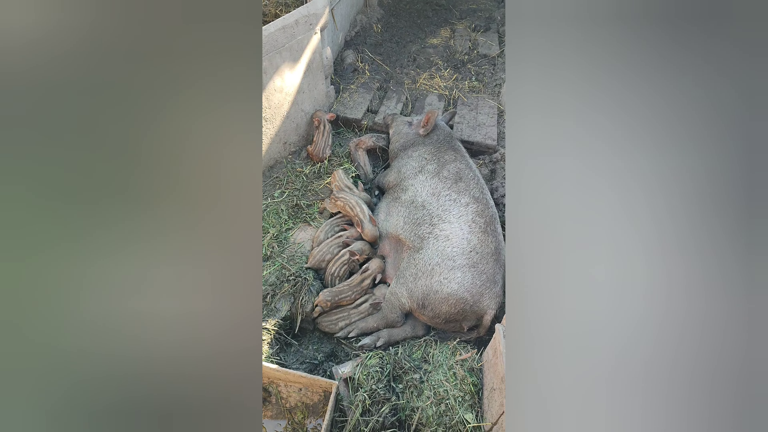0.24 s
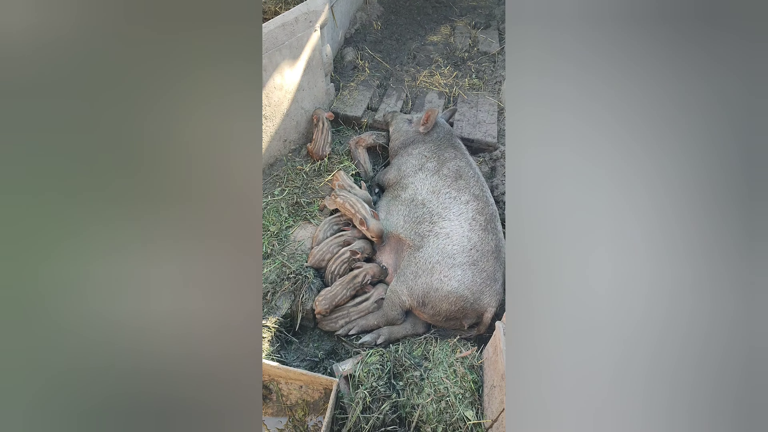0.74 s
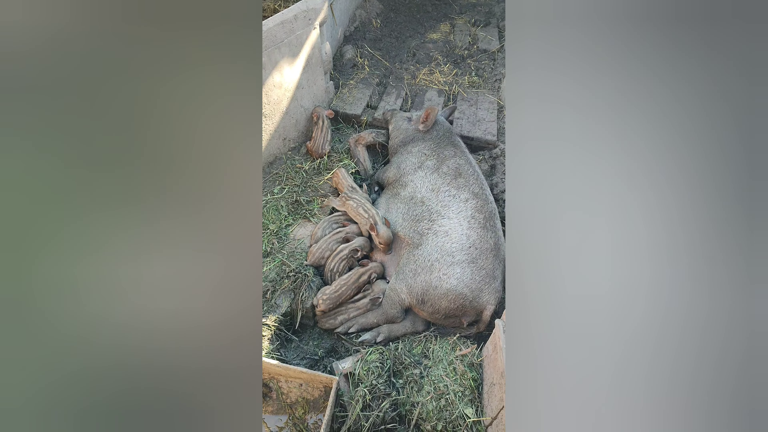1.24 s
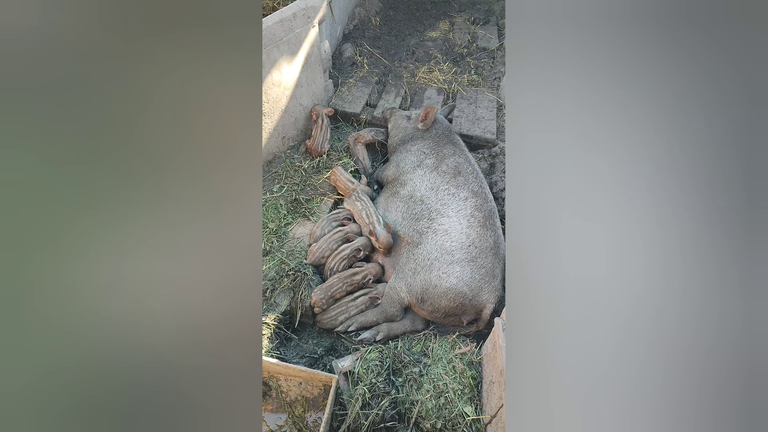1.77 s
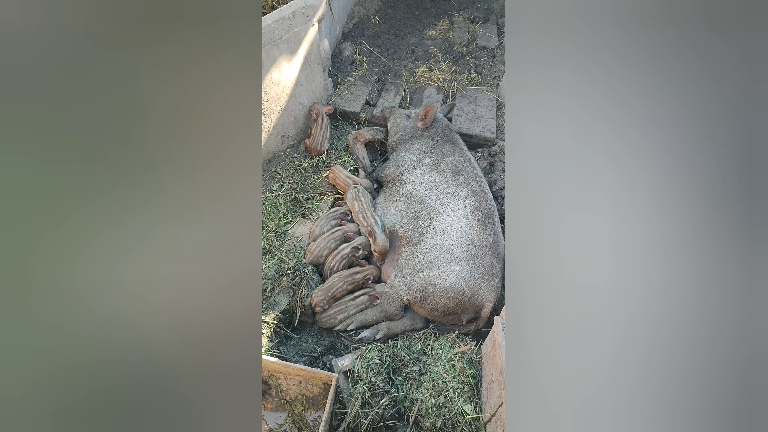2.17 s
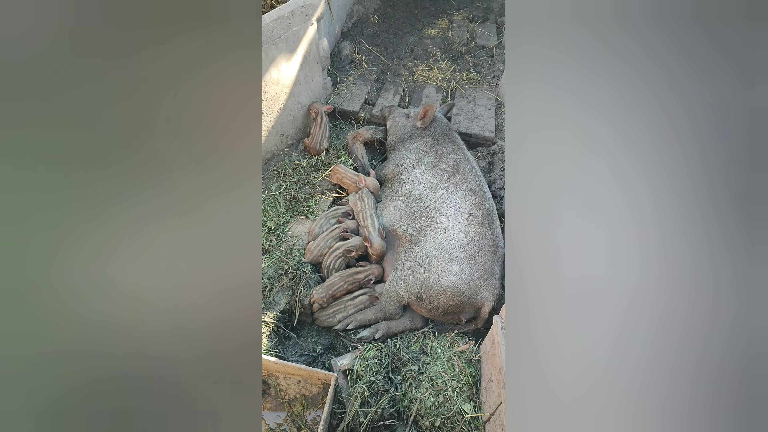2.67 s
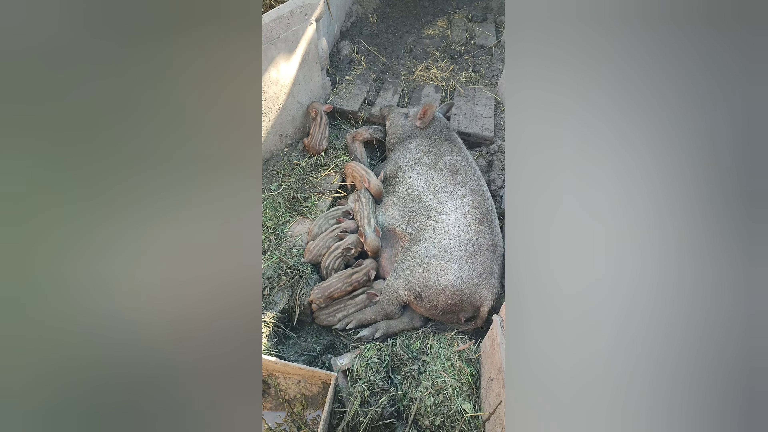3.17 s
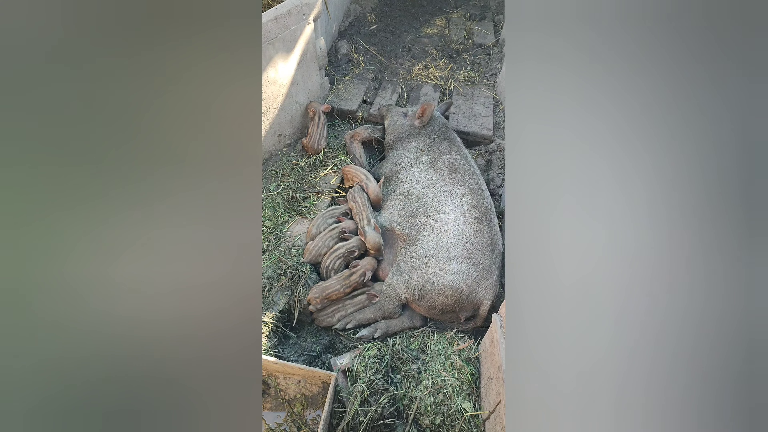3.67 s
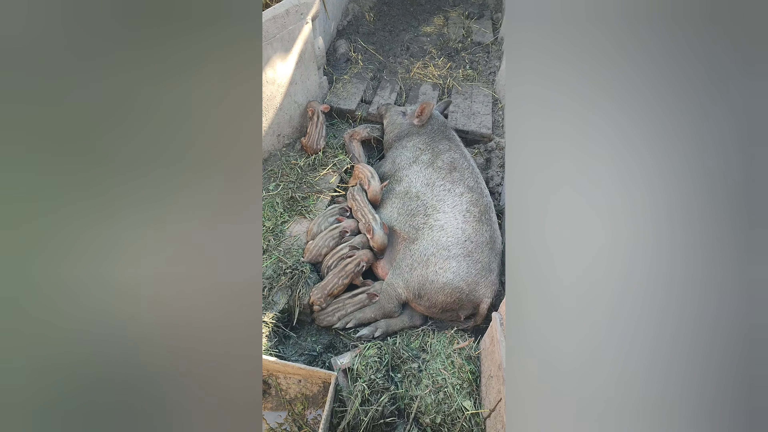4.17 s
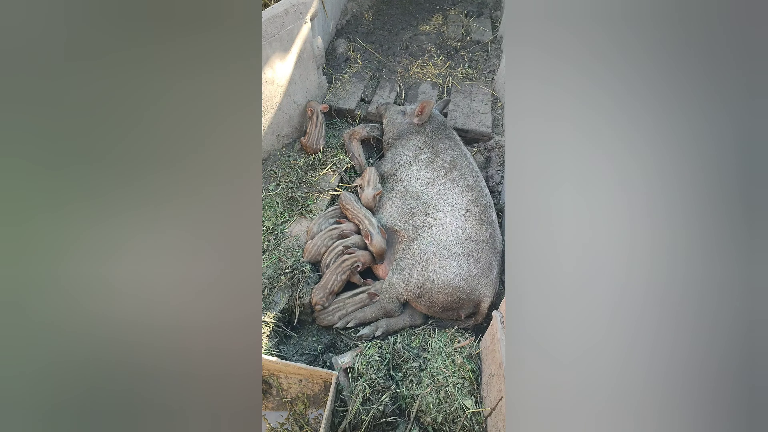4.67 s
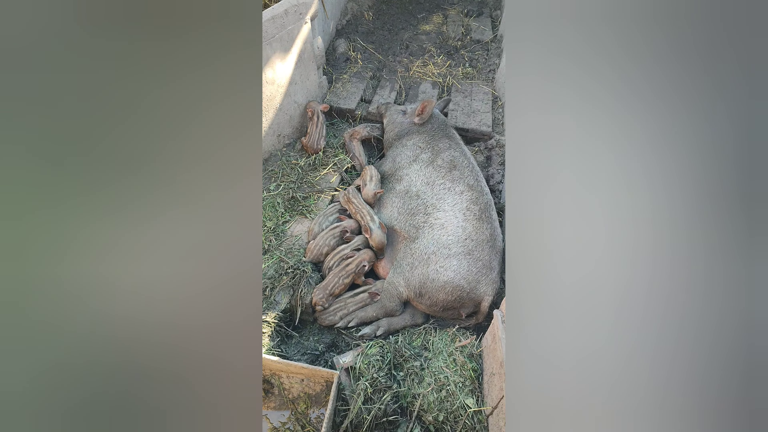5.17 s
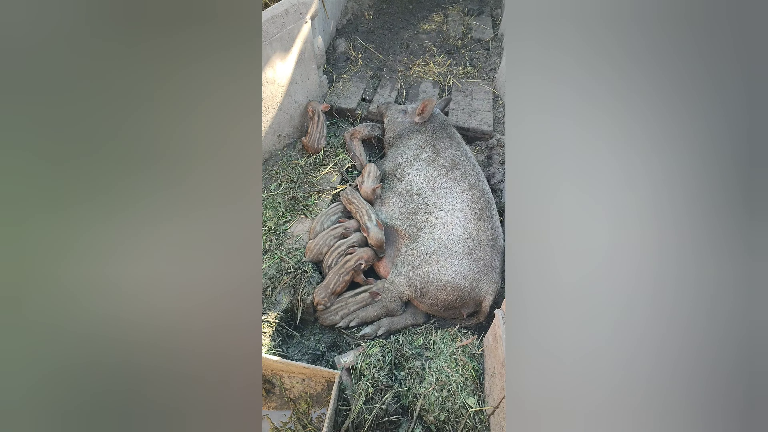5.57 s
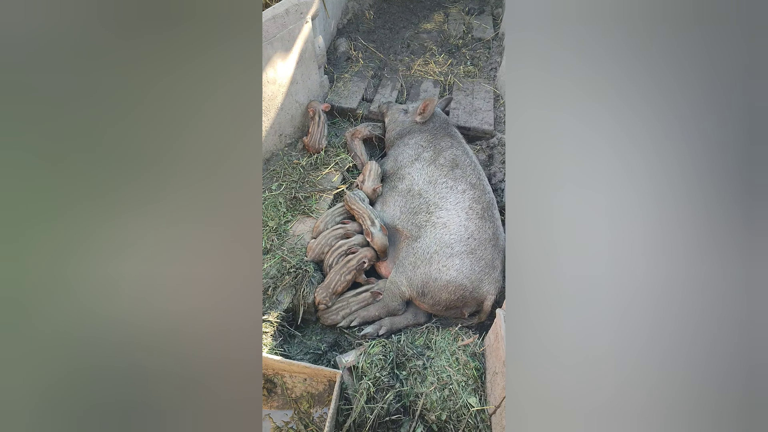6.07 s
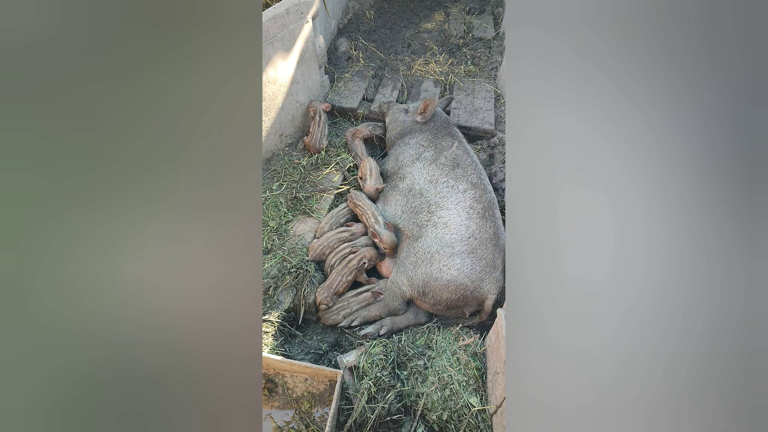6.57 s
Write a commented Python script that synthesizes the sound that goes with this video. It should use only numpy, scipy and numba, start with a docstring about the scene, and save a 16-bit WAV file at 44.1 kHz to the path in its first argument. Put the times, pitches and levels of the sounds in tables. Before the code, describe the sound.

A sow grunts low and rough at close range while piglets give short croaks and smacks, grass rustling, wind buffeting, over a soft distant rumble.

```python
"""Grassy outdoor pen, sow close to a hand-held phone with two microphone ports.
She lies nursing and grunts in a slow rhythm: slapping vocal folds ring chest, throat, snout and nostrils.
Her piglets croak with fast small slaps, smack their lips and shuffle in grass that rustles and snaps.
A low far-off rumble of shaped noise lies under it all; low noise fills in early grunt bass, then a gust
pushes both ports in lumps, and its sharpest buffets are lopsided bumps on the right port."""
import sys
import numpy as np
from scipy import signal
from scipy.fft import rfft, irfft
from scipy.io import wavfile
from scipy.ndimage import uniform_filter1d
from numba import njit

SR = 44100
rng = np.random.default_rng(int(sys.argv[2]) if len(sys.argv) > 2 else 0)


def materialize(psi):
    """Save the field psi as 16-bit PCM at rate SR to the path in sys.argv[1].

    A 1-D psi becomes a single channel; in a 2-D psi each row is a channel.
    """
    bounded = np.clip(np.atleast_2d(psi).T, -1, 1)
    quanta = np.round(bounded * 32767).astype(np.int16)
    wavfile.write(sys.argv[1], SR, quanta)


def amplitude_ratio(level_db):
    """Convert a level in decibels to the matching linear amplitude (field) ratio."""
    exponent = np.asarray(level_db, float) / 20
    return 10 ** exponent


N = 301191
T = np.arange(N) / SR
PIGLET_LAG = 4  # samples by which the left port hears the piglets later


def unit(x):
    """Scale to rms 1."""
    return x / np.sqrt(np.mean(x ** 2) + 1e-30)


@njit
def svf(x, hz, width):
    """State-variable band-pass with a moving centre, gain 1 at the centre."""
    y, band, low = np.empty(len(x)), 0., 0.
    for i in range(len(x)):
        g, k = np.tan(np.pi * hz[i] / SR), width / hz[i]
        v = (band + g * (x[i] - low)) / (1 + g * (g + k))
        band, low, y[i] = 2 * v - band, low + 2 * g * v, k * v
    return y


def resonate(x, modes, scale=1, blur=1):
    """Sum of resonances with alternating sign, as along a tube; rms 1."""
    ones = np.ones(len(x))
    total = np.zeros(len(x))
    for k, (hz, width, db) in enumerate(modes):
        total += (-1) ** k * amplitude_ratio(db) * svf(x, hz * scale * ones, 1. * width * blur)
    return unit(total)


def walk(rate):
    """Random levels held 1 / rate s and slewed twice; spread near 1."""
    k = int(SR / rate)
    steps = np.repeat(rng.standard_normal(N // k + 1), k)
    return 1.23 * uniform_filter1d(uniform_filter1d(steps, k), k)[:N]


def coloured(points, flicker_db, rate):
    """Noise of a given spectrum whose octaves flicker each alone; rms 1."""
    hz = np.fft.rfftfreq(N, 1 / SR) + 1
    f, db = np.transpose(points)
    spec = rfft(rng.standard_normal(N)) * amplitude_ratio(np.interp(np.log(hz), np.log(f), db, left=-90))
    octave = np.log2(hz / 20)
    total = np.zeros(N)
    for k in range(11):
        band = irfft(spec * np.clip(1 - abs(octave - k), 0, 1), N)
        total += band * amplitude_ratio(flicker_db * walk(rate))
    return unit(total)


def folds(rate_hz, rough, alternate_db, delay_s=0.0041):
    """Vocal folds: uneven slaps, every second one weaker, each followed by a puff of turbulent air."""
    n = len(rate_hz)
    rough = np.clip(rough, 0, 1)
    chance, noise = rng.standard_normal((100, 2)), rng.standard_normal(20000)[:n]
    slaps, puff, i, k = np.zeros(n), np.zeros(n), int(delay_s * SR), 0
    while i < n:
        size = amplitude_ratio(alternate_db * (k % 2) + (2.0 + 0.61 * rough[i]) * chance[k, 0])
        slaps[i] = -size
        jitter = np.clip((0.016 + .2 * rough[i]) * chance[k, 1], -.5, .5)
        period = int(SR / rate_hz[i] * (1 + jitter))
        age = np.arange(min(period, n - i)) / period
        puff[i:i + period] = size * np.exp(-age / (.4 + rough[i]))
        i, k = i + period, k + 1
    return np.sqrt(1 - rough) * unit(slaps) + np.sqrt(rough) * unit((puff + rough) * noise)


def span(rows, fade=0.0024):
    """Sample range of a call, its columns at every sample, and a short fade (s) at both ends."""
    s, *columns = np.transpose(rows)
    i, j = int(s[0] * SR), min(int(s[-1] * SR), N)
    edge = np.clip(np.minimum(T[i:j] - s[0], s[-1] - T[i:j]) / fade, 0, 1)
    return slice(i, j), [np.interp(T[i:j], s, c) for c in columns], edge


def place(x, pan_db, lag):
    """To both ports: a level difference (left minus right) and a later arrival on the left."""
    return np.array([np.roll(x * amplitude_ratio(pan_db / 2), lag), x * amplitude_ratio(-pan_db / 2)])


def clicks(events, ring, spread, lag):
    """A sudden break: a burst of noise around a centre, with more or less of a clear cavity ring."""
    out, t = np.zeros((2, N)), np.arange(int(.06 * SR)) / SR
    for (s, db, hz, t60, pan_db), noise in zip(events, rng.standard_normal((len(events), len(t)))):
        centre = hz + 0 * t
        hiss = svf(svf(noise, centre, spread * hz), centre, 1.3 * spread * hz)
        burst = ring * np.sin(2 * np.pi * hz * t) + 0.59 * unit(hiss)
        attack = np.minimum(t * hz / 1.5, 1)
        click = burst * np.exp(-np.log(1000) * t / t60) * attack
        i = int(s * SR)
        out[:, i:i + len(t)] += place(amplitude_ratio(db) * click, pan_db, lag)
    return out


def sow():
    """Slow slaps ring belly, chest, throat and snout; air hisses through the nostrils."""
    # grunts, one curve each: t/s, effort as chest level/dB, mouth opening as level over the chest/dB
    grunts = [
        [(0.0, -65, 9), (0.02, -61, 8.5), (0.06, -49, -12)],
        [(0.062, -51, -13), (0.076, -46, -4.5), (0.086, -44, -12), (0.164, -35, -1), (0.19, -35.5, -5.5),
         (0.215, -43, -20)],
        [(0.215, -42, -18.5), (0.267, -57.5, 3.5), (0.31, -59.5, -5)],
        [(0.5, -61, -2), (0.544, -54.5, 2.5), (0.565, -55, -24)],
        [(0.565, -61, -28), (0.579, -40, -20.5), (0.641, -46, -12), (0.661, -41.5, -8.5), (0.685, -41.5, -17),
         (0.74, -54.5, -15)],
        [(1.04, -47, -19), (1.072, -47.5, -14), (1.094, -44.5, -29), (1.16, -54.5, 5.5), (1.178, -43.5, -3.5),
         (1.25, -53, -3)],
        [(1.25, -47, 3), (1.268, -51.5, -3.5), (1.298, -48.5, -13), (1.34, -60.5, -7), (1.356, -56, -21),
         (1.38, -60, -15)],
        [(1.95, -50, -26), (1.958, -53, -36), (1.962, -51, -28), (1.996, -58.5, -14.5), (2.112, -49.5, -23.5),
         (2.17, -78, -4.5)],
        [(2.37, -52, -16), (2.378, -49.5, -8), (2.408, -65, -5), (2.556, -72, 6.5), (2.574, -95, 7),
         (2.6, -74, -3)],
        [(2.97, -63, -12), (2.984, -51, -9), (3.002, -59, 2), (3.016, -52.5, -4), (3.13, -63.5, -1.5),
         (3.17, -72, -8)],
        [(3.49, -60, -8), (3.51, -55.5, 1.5), (3.562, -49, -1.5), (3.606, -50.5, -3), (3.646, -51, -15),
         (3.7, -78, -10)],
        [(4.12, -61, -16), (4.178, -49, -9.5), (4.196, -46.5, -1), (4.22, -57, -3), (4.25, -53.5, -11),
         (4.33, -76, 0)],
        [(5.26, -47, 0), (5.314, -48, -12), (5.324, -58.5, 1), (5.344, -55, -12), (5.348, -56, 1.5),
         (5.4, -63, -11)],
        [(5.93, -68, -16), (5.948, -68, -1), (6.006, -62, -3), (6.058, -76, 1), (6.066, -85, 13),
         (6.08, -95, 2)],
        [(6.31, -70, -3), (6.352, -77, 10.5), (6.38, -68.5, -0.5), (6.394, -71, -4), (6.412, -83, -4),
         (6.42, -88, 1)],
    ]
    # per grunt: first and last pulse rate f/Hz, mid-grunt chest f/Hz, throat f/Hz at 0 dB opening,
    # mid-grunt throat and breath level/dB beside the snout
    voices = [(50.7, 33, 123, 510, -6, -27), (37.57, 73, 190, 573, -9, -12.5),
              (81.6, 30, 210, 600, -1.5, -11), (69.7, 62, 192, 560, -5.5, -21),
              (94, 110, 210, 620, 2, -3.5), (81.2, 57, 217, 640, -0.5, -1), (99.7, 75, 200, 450, 10, -15),
              (59.9, 71, 166, 674, 12.5, 0.5), (60.6, 73, 212, 610, 5.5, -8.5),
              (38.55, 34, 206, 740, 5.5, -5), (55.13, 130, 230, 648, 1.5, -4),
              (50.48, 60, 216, 600, 0, -7.5), (35.1, 45, 210, 500, -3.5, -6), (50.4, 110, 167, 480, 9, -5),
              (37.3, 81, 150, 520, 10, -7)]
    # per grunt: first slap t/s, first and last roughness (0-1)
    roughness = [(.004, .7, .7), (.0745, .05, .15), (.22, .6, .8), (.51, .7, .7), (.57, .3, .3),
                 (1.062, .6, .97), (1.258, .45, .7), (1.96, .8, .8), (2.38, .8, .8), (2.9995, .0, .95),
                 (3.5105, .5, .85), (4.152, .7, .65), (5.3225, .15, .5), (5.95, .7, .7), (6.33, .7, .7)]
    # snout resonances: f/Hz, width/Hz before blur, level/dB
    snout_modes = [(1168, 49, -4.5), (1350, 44, -1.5), (1538, 71, -0.5), (1715, 136, -5)]
    # nostril resonances: f/Hz before the sag, width/Hz before blur, level/dB
    nostril_modes = [(2540, 120, 7), (3190, 63, 13), (3730, 190, 1), (5200, 120, -18)]
    out = np.zeros((2, N))
    for rows, voice, (slap_s, first_rough, last_rough) in zip(grunts, voices, roughness):
        first_hz, last_hz, chest_hz, throat_hz, throat_db, breath_db = voice
        at, (db, open_db), edge = span(rows)
        n = len(db)
        ones, along = np.ones(n), np.linspace(-.5, .5, n)
        rough = (first_rough + last_rough) / 2
        # as the sow settles the chest ring widens by 6 Hz/s; roughness widens every resonance but the belly
        chest_width = 44.5 + 107 * rough + 6 * slap_s
        blur = .7 + 2.4 * rough
        chest_hz = chest_hz * (1 + 0.13 * along)  # climbs through a grunt
        throat_hz = throat_hz + 6.5 * np.clip(open_db, -30, 10)  # rises as the mouth opens, Hz per dB
        rate_hz = np.linspace(first_hz, last_hz, n)
        source = folds(rate_hz, np.linspace(first_rough, last_rough, n), -2.5, max(slap_s - rows[0][0], 0))
        chest = unit(svf(svf(source, chest_hz, 1. * chest_width), chest_hz, 1. * chest_width))
        belly = unit(svf(svf(source, 110 * ones, 80.0), 110 * ones, 120.0))
        chest = chest - amplitude_ratio(-7 + slap_s) * belly  # the belly gains 1 dB/s as she settles
        throat = svf(source, throat_hz, 60. * blur)
        throat = throat - amplitude_ratio(-6.5) * svf(source, 1.42 * throat_hz, 180.0 * blur)
        throat = throat - amplitude_ratio(-5.5) * svf(source, 0.687 * throat_hz, 32.0 * blur)
        throat = unit(svf(throat, throat_hz, 830.0))
        # the soft tissue keeps the valleys between the resonances dark
        snout = svf(resonate(source, snout_modes, blur=blur), 1450 * ones, 2600.0)
        # nostril resonances sink by a share of 0.03/s; rough breath smears them most
        breath = resonate(source, nostril_modes, 1 - 0.03 * slap_s, 1.5 + 3.5 * rough)
        breath = svf(breath, 3300 * ones, 3800.0)
        # through a grunt the throat fills and the breath runs out
        mouth = amplitude_ratio(throat_db + 5.5 * along) * throat + snout + amplitude_ratio(breath_db - 10 * along) * breath
        out[:, at] += place(edge * amplitude_ratio(db) * (chest + amplitude_ratio(open_db) * mouth), -1.8, 7)
    return out


def rustle():
    """Bodies shuffle and dry stalks crackle all around, so the ports hear unrelated grains of noise."""
    # shuffling in the grass: t/s, level/dB
    shuffles = [(0, -61), (.08, -59), (.47, -66), (.55, -57.5), (.78, -66.5), (.86, -56.5), (.97, -66),
                (1.08, -63.5), (1.18, -51.5), (1.3, -60.5), (2.15, -66.5), (2.28, -62.5), (2.85, -68.5),
                (3.14, -67), (3.3, -73.5), (3.61, -58), (3.88, -71), (4.17, -62), (4.3, -61.5), (4.39, -70),
                (5.1, -73), (5.2, -68), (5.5, -69.5), (6.3, -68), (6.5, -64.5), (6.83, -73.5)]
    # grass spectrum: f/Hz, relative level per Hz/dB
    grass = [(530, -27), (900, -6.5), (1060, -11), (1210, -2.5), (1660, -11), (3430, -13.5), (4740, -12.5),
             (6710, -10), (9160, -28.5), (14200, -22)]
    db = np.interp(T, *np.transpose(shuffles))
    grains = [unit(amplitude_ratio(2.5 * walk(300))) * coloured(grass, 1.6, 12) for _ in range(2)]
    return amplitude_ratio(db - 3 * np.array([[.5], [-.5]])) * grains  # 3 dB weaker on the left


def grunt_bass_and_gust():
    """Lumpy low noise, unrelated at the ports: early grunt bass, then eddies and single lopsided bumps."""
    # low-frequency level, early grunt bass and then the gust: t/s, level/dB, left minus right/dB
    lows = [(0, -45, 2), (.17, -39.5, 0), (.21, -46, 11), (.27, -49, 13), (.33, -65, 2), (.51, -50, 13),
            (.97, -47, -20), (1.07, -36.5, -6), (1.24, -41.5, 1), (1.35, -36, -12.5), (1.44, -41, -9),
            (1.5, -38, -15), (1.56, -42.5, -9.5), (1.7, -34, -14), (1.85, -41.5, -19), (2.16, -39, -13.5),
            (2.25, -50, -12), (2.43, -45, -17.5), (2.48, -54, 2), (2.6, -72, 0)]
    # spectrum of the lows: f/Hz, relative level per Hz/dB
    colour = [(12, -41), (20, -1.5), (45, -3.5), (85, -13.5), (160, -19.5), (260, -30), (450, -51),
              (900, -93)]
    # sudden buffets on the right port: t/s, peak level/dB, time scale/ms
    buffets = [(1.437, -28.5, 1.47), (1.465, -28, 1.22), (1.488, -45, 0.98), (1.668, -26.5, 1.25),
               (1.682, -25.5, 0.88), (1.756, -33.5, 1.25), (1.844, -31, 1.5), (1.927, -35, 2),
               (1.972, -27.5, 1.9), (2.001, -29.5, 2.3), (2.033, -31, 1.9), (2.077, -31.5, 1.8),
               (2.107, -28, 1.83), (2.199, -28.5, 1.96)]
    s, db, pan_db = np.transpose(lows)
    db, pan_db = np.interp(T, s, db, right=-99), np.interp(T, s, pan_db)
    lumps = [unit(amplitude_ratio(1.8 * walk(15))) * coloured(colour, 5.9, 25.04) for _ in range(2)]
    out = amplitude_ratio(db + np.array([pan_db, -pan_db]) / 2) * lumps
    for s, peak_db, ms in buffets:
        at = slice(int(s * SR), int(s * SR) + 2000)
        u = (T[at] - s) / (ms / 1000) - 2
        u = u - np.exp(-(u + 2) * 1.5) * 2  # the front steepens but starts from rest
        out[1, at] += amplitude_ratio(peak_db) * (1 - u ** 2) * np.exp(-u ** 2 / 2)
    return out


def yard():
    """Far rumble and air: the bass is nearly the same at both ports, the treble unrelated."""
    # steady background: f/Hz, relative level per Hz/dB
    background = [(13, -13), (22, -6), (70, 1.5), (109, -8.5), (124, -25), (192, -18), (304, -25),
                  (348, -22), (482, -23), (723, -27.5), (1350, -39), (1460, -41), (1920, -39.5),
                  (6300, -60), (14200, -56)]
    # slow uneven drift of the low rumble's level: t/s, gain/dB
    drift = [(0, -2), (2.5, 0), (3.1, 1.5), (3.7, 0.5), (4.4, -0.5), (5.0, 2), (5.6, -0.5), (6.2, 0),
             (6.83, 1)]
    # a faint band of hiss: f/Hz, width/Hz, level/dB before its slow flicker
    hiss_band = (717, 110, -68.5)
    mid, side = coloured(background, 1.5, 6), coloured(background, 1.5, 6)
    hz = np.fft.rfftfreq(N, 1 / SR)
    side = irfft(rfft(side) * np.clip(0.13 + (hz / 1150) ** 1.5, 0, 1), N)
    rumble = irfft(rfft(mid) * (hz < 115), N)
    mid = mid + rumble * (amplitude_ratio(np.interp(T, *np.transpose(drift))) - 1)
    hiss_hz, hiss_width, hiss_db = hiss_band
    hiss_level = amplitude_ratio(hiss_db + 2.0 * walk(3.4))
    hiss = hiss_level * resonate(rng.standard_normal(N), [(hiss_hz, hiss_width, 0)])
    balance = amplitude_ratio(np.array([[-.7], [.7]]))
    return amplitude_ratio(-52) * balance * np.array([mid + side, mid - side]) + hiss


def lip_smacks():
    """Lips part suddenly: a short burst of noise with a strong ring of the mouth cavity."""
    # smacks: t/s, level/dB, cavity f/Hz, t60/s, left minus right/dB
    smacks = [(0.335, -55, 750, 0.032, 3), (1.06, -45, 620, 0.036, 0), (2.326, -48.5, 736, 0.09, 2),
              (4.645, -47.5, 1250, 0.025, -2), (4.964, -48, 1210, 0.023, -3.0)]
    return clicks(smacks, .8, .45, PIGLET_LAG)


def piglets():
    """Fast small slaps ring a steep group of mouth resonances over a fainter low resonance."""
    # croaks: t/s, length/s, level/dB, mid-croak mouth f/Hz, mid-croak pulse rate f/Hz
    croaks = [(0.767, 0.069, -57, 1240, 217.4), (.811, 0.093, -43.5, 1320, 212),
              (1.532, 0.072, -56, 1110, 146.3), (2.54, 0.048, -59, 1096, 154),
              (2.686, 0.061, -61.5, 1200, 181.8), (2.846, 0.052, -60.5, 1190, 163),
              (4.517, 0.078, -57, 1164, 149.2), (4.872, 0.065, -56.5, 1130, 197),
              (5.591, 0.07, -53.5, 1320, 193.7), (6.789, 0.032, -63, 1370, 192.5)]
    # roughness per croak (0-1)
    roughness = [.2, .1, .7, .5, .4, .5, .1, .2, .3, .3]
    out = np.zeros((2, N))
    for (s, length, db, mouth_hz, rate_hz), rough in zip(croaks, roughness):
        at = slice(int(s * SR), min(int((s + length) * SR), N))
        t = T[at] - s
        attack_s = 0.0033 + 0.021 * rough ** 2  # rough croaks swell in more slowly
        release = (1 - t / length) / 0.49  # over this share of the length
        shape = np.clip(np.minimum(t / attack_s, release), 0, 1) * amplitude_ratio(-2 * t / length)
        from_middle = t - length / 2
        mouth_hz = mouth_hz + 830 * from_middle  # rises, Hz/s
        source = folds(rate_hz - 100 * from_middle, rough + 0 * t, -3.5)  # pulse rate sags, Hz/s
        mouth = svf(source, mouth_hz, 230.0)
        mouth = mouth - amplitude_ratio(-3.5) * svf(source, 1.436 * mouth_hz, 140.0)
        mouth = mouth + amplitude_ratio(-11.0) * svf(source, 1.71 * mouth_hz, 166.0)
        mouth = unit(svf(mouth, 1.15 * mouth_hz, 1100.))
        # low and upper resonances: (Hz, width Hz, dB)
        rest = resonate(source, [(363, 144, 6), (2240, 1200, -9), (4300, 1700, -11)])
        out[:, at] += place(shape * amplitude_ratio(db) * (mouth + amplitude_ratio(-7.5) * rest), -2.5, PIGLET_LAG)
    return out


def stalk_snaps():
    """Stalks snap: very short bursts of broad noise with little ring."""
    # snaps: t/s, level/dB, centre f/Hz, t60/s, left minus right/dB
    snaps = [(1.0251, -50.5, 6160, 0.017, -18), (1.4018, -45.5, 4450, 0.016, -10),
             (1.5806, -50.5, 2400, 0.012, -10), (2.9076, -35, 3300, 0.006, -3),
             (3.9974, -51, 3620, 0.011, -6), (4.7032, -51, 2820, 0.015, -2),
             (4.7364, -56, 2640, 0.014, -2.5), (5.1956, -63, 4680, 0.012, 1),
             (6.2203, -45, 4540, 0.0075, -11), (6.2324, -45.5, 6600, 0.0077, -7),
             (6.5096, -46.5, 6200, 0.01, -11.5)]
    return clicks(snaps, .3, 1.0, 3)


def scene():
    """Pigs and snaps with scattered early echoes off walls and ground, over grass, low lumps and yard."""
    snaps = stalk_snaps()
    smacks = lip_smacks()
    pigs = sow() + piglets() + smacks + snaps
    t = np.arange(int(.08 * SR)) / SR
    decay = np.exp(-np.log(1000) * t / 0.053)  # t60 of 53 ms
    echoes = rng.standard_normal((2, len(t))) * decay * (t > .002)
    pen = amplitude_ratio(-23.5) * signal.fftconvolve(pigs, echoes, axes=1)[:, :N]
    return pigs + pen + rustle() + grunt_bass_and_gust() + yard()


def roll_off(x):
    """The treble ends steeply here."""
    return signal.sosfilt(signal.butter(12, 14520, fs=SR, output="sos"), x)


def record(dry):
    """The phone cuts the top steeply above 14150 Hz."""
    low_pass = signal.ellip(12, .2, 70, 14150, fs=SR, output="sos")
    cut = signal.sosfilt(low_pass, dry)
    return roll_off(cut)


dry = scene()
out = record(dry)
materialize(out)
```